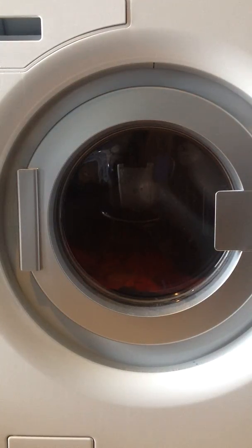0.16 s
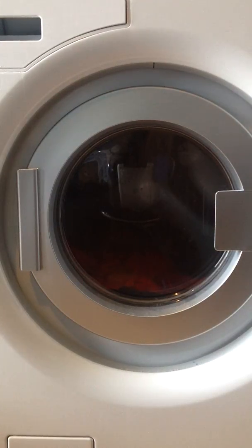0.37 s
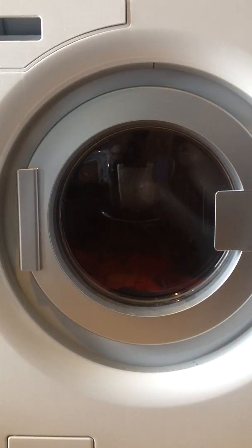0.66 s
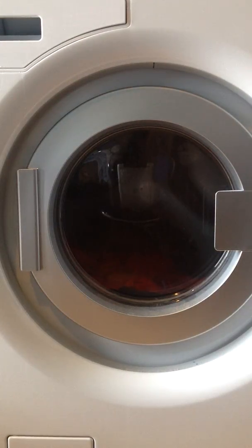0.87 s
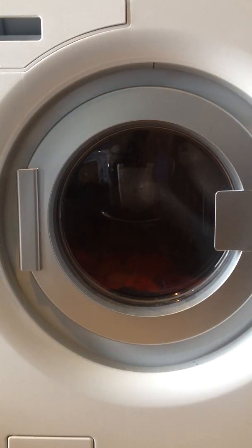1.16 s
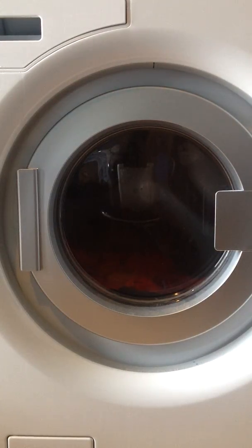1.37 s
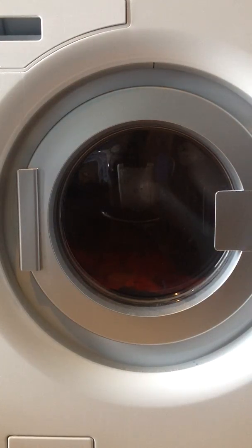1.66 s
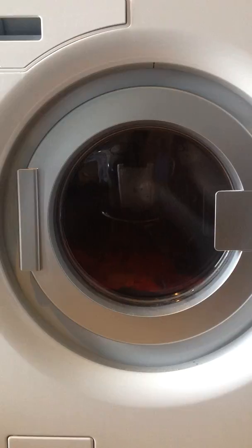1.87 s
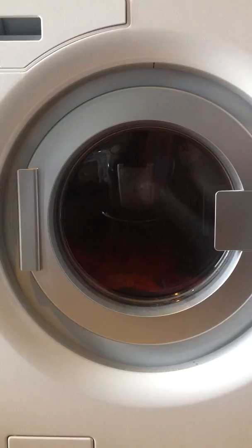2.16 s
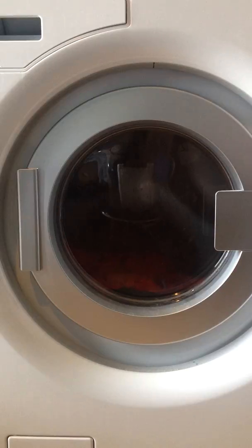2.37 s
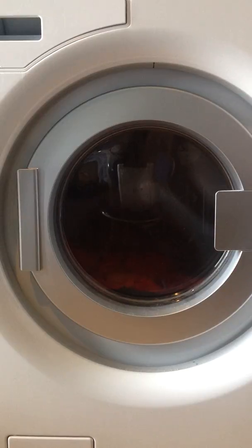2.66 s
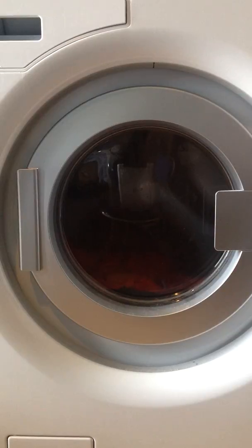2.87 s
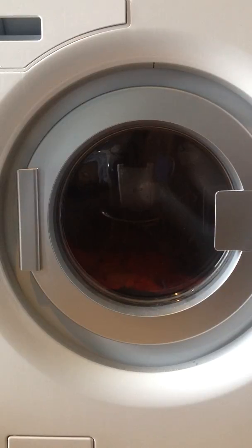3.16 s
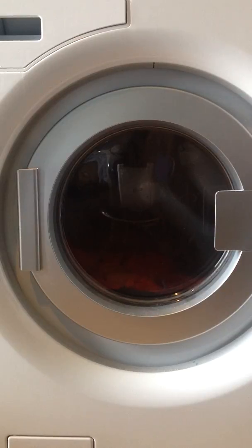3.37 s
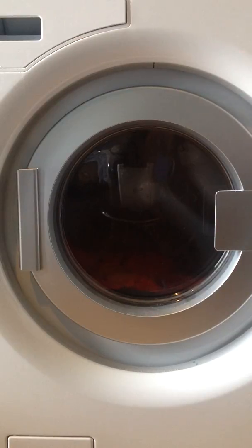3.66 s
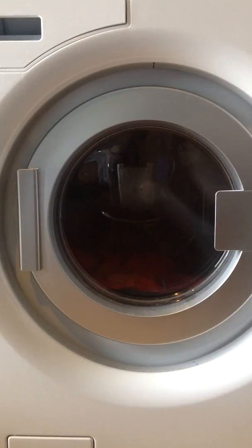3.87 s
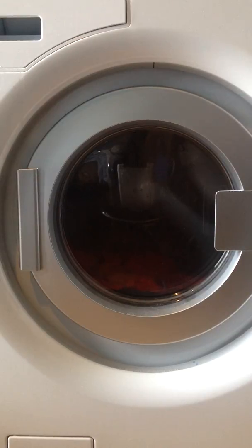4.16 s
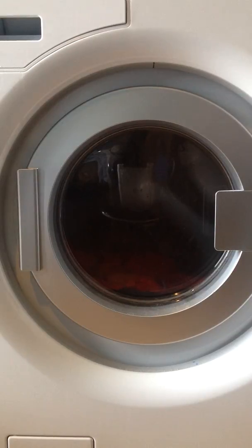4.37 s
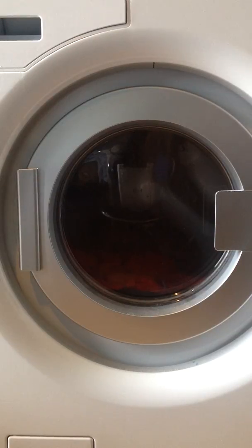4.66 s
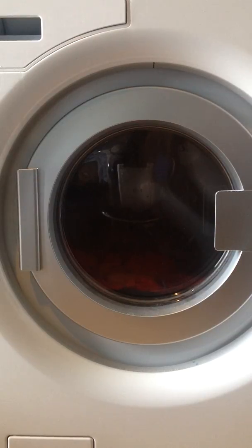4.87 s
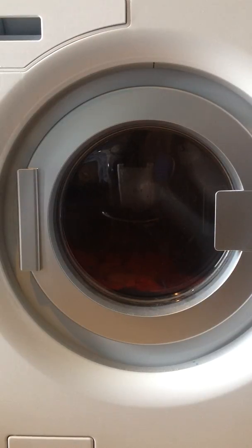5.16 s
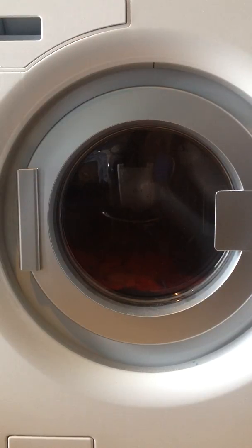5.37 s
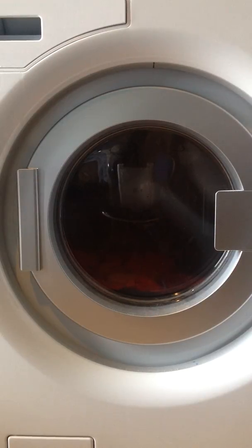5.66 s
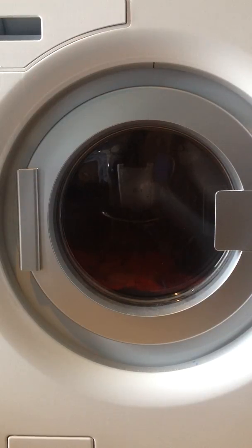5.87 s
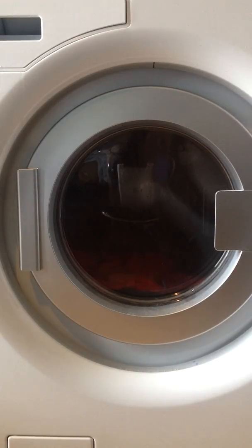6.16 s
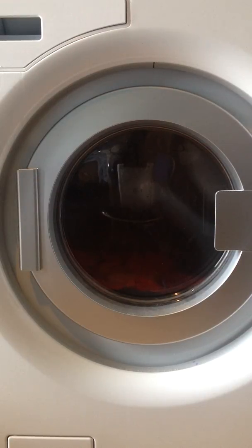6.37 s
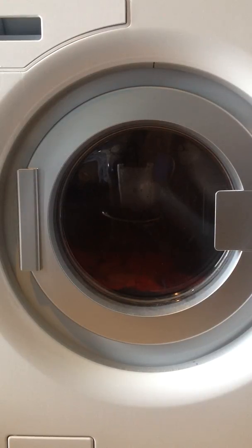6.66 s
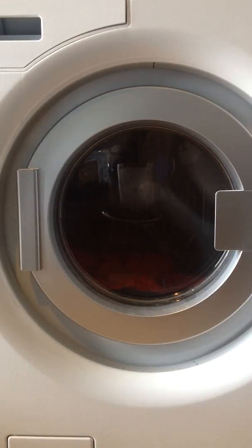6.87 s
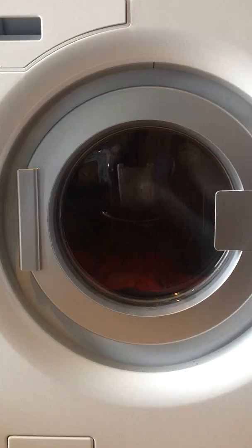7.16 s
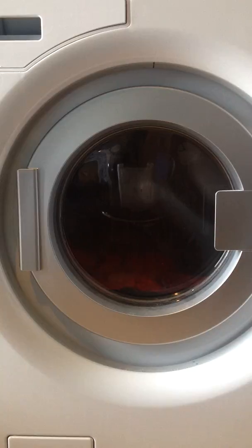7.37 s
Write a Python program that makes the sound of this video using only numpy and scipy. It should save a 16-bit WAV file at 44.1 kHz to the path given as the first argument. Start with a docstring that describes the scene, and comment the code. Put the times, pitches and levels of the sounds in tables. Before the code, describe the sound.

A faint steady hiss fills a small, hard-walled room. From about 0.5 to 1.4 seconds, four plastic buttons click on a nearby washing machine, growing louder, mixed with soft dull thuds of someone stepping about. At 1.7 seconds the door lock snaps shut with a sharp double clack and a brief ring, the loudest sound. A thud and a small click follow just after 2 seconds. Around 3.7 seconds a very faint low house rumble swells and fades, with two light taps. Between 4.1 and 4.8 seconds come more dull thuds, two clicks and a ringing tap. Cloth brushes faintly from 5 to 5.7 seconds, with another thud at 5.4. After a tiny click near 7 seconds, the pump starts at about 7.3 seconds with a few quick knocks, a rumble and a watery hiss, running briefly until the end.

```python
"""A front-loading washer is started in a small, hard-walled room, over a steady hiss.
Plastic buttons click among the dull thuds of someone stepping about; then the door bolt snaps shut and
rebounds. A low murmur of the house swells once, taps ring out between more thuds, and cloth brushes by.
After a last click the pump starts up with rumble, water hiss and a few knocks of its impeller.
Clicks, thuds and lock ring the room's low modes; they and the taps leave a short diffuse tail."""
import sys
import numpy as np
from scipy import signal
from scipy.fft import rfft, irfft
from scipy.io import wavfile

SR = 44100
rng = np.random.default_rng(int(sys.argv[2]) if len(sys.argv) > 2 else 0)


def persist_wave(psi):
    """Save psi, clipped to +-1, as 16-bit WAV."""
    counts = np.round(np.clip(psi, -1, 1) * 32767).astype(np.int16)
    wavfile.write(sys.argv[1], SR, np.atleast_2d(counts).T)


N = 331632

# room tone: freq_hz, density_db
ROOM_TONE_SPECTRUM = [(15, -62), (25, -29), (43, -28.5), (136, -7.5), (227, -3), (281, -10), (322, -1.5),
                      (368, -9.5), (537, -7.5), (684, -7.5), (826, -8), (1490, -10.5), (5430, -12.5),
                      (13900, -16.5), (15500, -22.5)]
# button clicks: start_s, snap_db, snap_hz, snap_decay_s, knock_db, knock_hz, thump_db
BUTTON_CLICKS = [(0.5392, -51, 1690, .003, -62, 1700, -66), (0.7163, -38, 5800, .003, -42, 980, -54),
                 (1.1218, -34, 1600, .003, -42, 1100, -57), (1.3882, -25.5, 7350, .0022, -50, 1000, -60),
                 (2.2992, -43, 3200, .005, -57, 2050, -60), (4.2483, -43, 6000, .004, -64, 1700, -68),
                 (4.5446, -39.5, 7000, .008, -50, 740, -69), (6.9695, -62, 2400, .0012, -52, 2400, -74)]
# bright plastic snap: freq_hz, density_db
SNAP_SPECTRUM = [(300, -29), (1500, 1.5), (4000, -1.5), (12000, -5), (15500, -11)]
# low modes of the room: pitch_hz, level_db, t60_s
ROOM_MODES = [(152, -11, .25), (190.2, -14.5, 0.35), (215.6, -7, .24), (278, -1, .14), (297.6, -6.5, 0.18),
              (335.4, -8, 0.19), (370.5, -5, 0.12), (456, -4.5, .12), (488, -3, 0.11), (552, 3, 0.04)]
# dull thuds, tilted brighter the harder they land: start_s, ring_db, tilt_db_per_octave
DULL_THUDS = [(0.577, -62, 0.3), (0.924, -50, 3), (1.421, -51.5, 2.2), (2.147, -42, 1.5),
              (2.313, -54.5, -1.5), (4.1201, -38.5, 1.6), (4.328, -45, -3.5), (4.434, -47, -3.6),
              (5.4219, -40, -.6), (6.765, -64.5, -22), (6.809, -62.5, -21)]
# slap at the front of a thud: freq_hz, density_db
SLAP_SPECTRUM = [(150, -22.5), (350, -14), (700, 1.5), (1200, -4), (2000, -13.5), (3500, -27), (7000, -36)]
# strike and rebound of the door bolt: start_s, level_db
BOLT_BLOWS = [(1.7048, .5), (1.7445, -7)]
# crack of one bolt contact: freq_hz, density_db
CRACK_SPECTRUM = [(150, -35), (300, -11), (900, -1), (2100, 0), (3200, -5.5), (4400, -9.5), (5500, -3.5),
                  (9000, -12.5), (15500, -12.5)]
# ring of door and cabinet: pitch_hz, level_db, t60_s
DOOR_RING_MODES = [(311.2, -12, .6), (529.2, -15, .45), (606.6, -1, 0.092), (860, -12, 0.3),
                   (1030, 0.5, .06), (1413, -6, 0.06), (1624, -4.5, .06), (1865, 2.5, .06),
                   (2329, -3.5, 0.073), (3260, -1.5, 0.054), (4500, -9, 0.024), (5560, -5, .04)]
# taps on a ringing part: start_s, low_modes_db, middle_modes_db, top_mode_db
RINGING_TAPS = [(3.545, -80, -72, -57.5), (3.66, -58, -55, -66), (4.753, -60.5, -53.5, -47.5)]
# that part's low, middle and top mode groups, each mode: pitch_hz, level_db, t60_s
TAP_MODE_GROUPS = [
    [(629, 6, 0.13), (654, 3.5, 0.18), (923, 3.5, 0.13)],
    [(1870, 4, 0.028), (2354, -6, .03)],
    [(4390, -2.5, 0.03)],
]
# strokes of cloth: centre_s, half_width_s, level_db
CLOTH_STROKES = [(5.101, .05, -67.5), (5.46, 0.055, -63.5), (5.641, 0.036, -61), (6.471, .015, -67)]
# cloth friction: freq_hz, density_db
CLOTH_SPECTRUM = [(500, -12), (1500, 2.5), (5000, -1), (9000, 1.5), (15500, -2)]
# cabinet resonances under the pump: centre_hz, width_hz, level_db
CABINET_RESONANCES = [(99, 34, -18), (162, 30, -6), (203, 27, -3), (277, 10.6, -0.5), (344, 20, 1.5),
                      (540, 29, -9), (660, 55, -9.5), (818, 63, -5.5), (1155, 60, -9), (2240, 170, -21)]
# water hiss in the pump: freq_hz, density_db
WATER_SPECTRUM = [(290, -23), (500, -10), (686, -21), (815, -4), (1250, -9.5), (1350, -6), (2460, -13.5),
                  (4070, -15.5), (15500, -29)]
# the impeller catching: start_s, housing_db, rattle_db
IMPELLER_KNOCKS = [(7.2855, -24.5, -42), (7.3335, -33.5, -42), (7.3515, -31, -47), (7.490, -43, -48)]
# ring of the pump housing: pitch_hz, level_db, t60_s
HOUSING_MODES = [(777, 1, 0.077), (824, 5.5, 0.037), (688, -7.5, 0.1), (1665, -8, 0.061), (2360, -9, 0.069)]
# decay of the room's tail: freq_hz, t60_s
TAIL_DECAY = [(300, 0.33), (1000, 0.28), (2000, 0.26), (5000, .22), (12000, 0.18)]
# colour of the room's tail: freq_hz, density_db
TAIL_SPECTRUM = [(150, -9.5), (300, -5), (600, -1), (2000, 0.5), (6000, -0.5), (15000, -5)]


def from_db(db):
    """Decibels to gain."""
    return 10 ** (np.asarray(db) / 20)


def rms_one(x):
    """Scale to rms 1."""
    return x / np.sqrt(np.mean(x ** 2) + 1e-20)


def at_hz(points, hz):
    """Read a curve on a log-frequency axis."""
    freqs_hz, values = np.transpose(points)
    return np.interp(np.log(hz), np.log(freqs_hz), values)


def coloured(spectrum, size):
    """Noise with the given spectrum, rms 1."""
    hz = np.maximum(np.fft.rfftfreq(size, 1 / SR), 1)
    return rms_one(irfft(rfft(rng.standard_normal(size)) * from_db(at_hz(spectrum, hz)), size))


def impulses(times_s, levels_db):
    """One spike at each time."""
    out = np.zeros(N)
    out[np.round(np.asarray(times_s) * SR).astype(int)] = from_db(levels_db)
    return out


def ring(force, modes):
    """A force sets every mode of a body ringing, signs alternating."""
    out = 0
    for k, (hz, level_db, t60_s) in enumerate(modes):
        r, w = from_db(-60 / (t60_s * SR)), 2 * np.pi * hz / SR
        mode = signal.lfilter([0, np.sin(w)], [1, -2 * r * np.cos(w), r * r], force + 1e-18)
        out = out + (-1) ** k * from_db(level_db) * mode
    return out


def resonance(x, hz, width_hz):
    """A band-pass with gain 1 at its peak."""
    r, w = np.exp(-np.pi * width_hz / SR), 2 * np.pi * hz / SR
    return signal.lfilter(np.array([1, 0, -1]) * (1 - r * r) / 2, [1, -2 * r * np.cos(w), r * r], x)


def add(out, start_s, piece):
    """Mix a piece in at its cue."""
    i = round(start_s * SR)
    out[i:i + len(piece)] += piece[:N - i]


def burst(noise, decay_s, attack_s=.0003):
    """Noise with a sharp attack and exponential decay; longer bursts carry more energy."""
    t = np.arange(len(noise)) / SR
    envelope = (1 - np.exp(-t / attack_s)) * np.exp(-t / decay_s) / 2
    return rms_one(noise * envelope) * np.sqrt(np.mean(envelope ** 2))


def push(cutoff_hz):
    """A soft contact: a force pulse of area 1, longer for a lower cut-off."""
    t = np.arange(800) / SR
    pulse = t * np.exp(-2 * np.pi * cutoff_hz * t)
    return pulse / pulse.sum()


def low_cut(x, hz, order):
    """Roll off the bass."""
    return signal.sosfilt(signal.butter(order, hz, "high", fs=SR, output="sos"), x)


def room_tone(hiss_db=-66, murmur_db=-79, swell_db=6, swell_at_s=3.7, swell_half_s=.6):
    """A bed of steady hiss, and a low murmur of the house that swells once."""
    t = np.arange(N) / SR
    murmur_gain = from_db(murmur_db + swell_db * np.exp(-((t - swell_at_s) / swell_half_s) ** 2))
    murmur = rng.standard_normal(N)
    for _ in range(2):
        murmur = resonance(murmur, hz=223, width_hz=210)
    return from_db(hiss_db) * coloured(ROOM_TONE_SPECTRUM, N) + murmur_gain * rms_one(murmur)


def button_clicks():
    """A bright plastic snap, the longer knock of the panel behind it and a low thump."""
    out = np.zeros(N)
    for start_s, snap_db, snap_hz, decay_s, knock_db, knock_hz, thump_db in BUTTON_CLICKS:
        noise = coloured(SNAP_SPECTRUM, 2048)
        snap = noise + 1.5 * resonance(noise, snap_hz, width_hz=1100)
        add(out, start_s, from_db(snap_db) * burst(snap, decay_s))
        panel = resonance(rng.standard_normal(8192), knock_hz, width_hz=300)
        add(out, start_s, from_db(knock_db) * burst(panel, 4.2 * decay_s))
        out += room_thump(start_s, thump_db, tilt_db_per_octave=2.1)
    return out


def room_thump(start_s, level_db, tilt_db_per_octave, scatter_db=1.5):
    """A soft blow rings the room's low modes, in a slightly different balance each time."""
    modes = np.array(ROOM_MODES)
    modes[:, 1] += tilt_db_per_octave * np.log2(modes[:, 0] / 300) + rng.normal(0, scatter_db, len(modes))
    force = np.pad(from_db(level_db) * push(cutoff_hz=990), (0, SR // 2))
    out = np.zeros(N)
    add(out, start_s, ring(force, modes))
    return out


def thuds():
    """Blows on floor and cabinet, as two layers: noisy slaps and low thumps."""
    slaps, thumps = np.zeros((2, N))
    for start_s, ring_db, tilt in DULL_THUDS:
        slap_db = ring_db - 5 + 2.9 * tilt   # harder blows slap louder
        add(slaps, start_s, from_db(slap_db) * burst(coloured(SLAP_SPECTRUM, 4096), decay_s=.017))
        thumps += room_thump(start_s, ring_db, tilt)
    return slaps, thumps


def door_lock(contact_gap_s=.0014, rattle_gap_s=.0065, door_db=-35.5):
    """The bolt hits and bounces: contacts that crack and ring the door, and one low thump."""
    strike_s, strike_db = BOLT_BLOWS[0]
    contacts = [(strike_s - .0016, strike_db - 28)]   # faint tick as the bolt is let go
    for start_s, level_db in BOLT_BLOWS:
        # five tight contacts, strongest in the middle, then three loose ones
        contacts += [(start_s + contact_gap_s * k, level_db - 2.2 * (k - 2) ** 2) for k in range(5)]
        for k in (1, 2, 3):
            delay_s = 4 * contact_gap_s + rattle_gap_s * (k + rng.uniform(-.25, .25))
            contacts.append((start_s + delay_s, level_db - 14))
    cracks = np.zeros(N)
    for start_s, level_db in contacts:
        add(cracks, start_s, from_db(level_db) * burst(coloured(CRACK_SPECTRUM, 2048), decay_s=.0014))
    force = impulses(*np.transpose(contacts)) * rng.choice([-1, 1], N)
    door = from_db(door_db) * ring(force, DOOR_RING_MODES)
    thump = room_thump(strike_s + contact_gap_s, level_db=-32, tilt_db_per_octave=5)
    return cracks + door, thump


def taps():
    """Each tap rings three groups of modes in a balance of its own."""
    times_s, *group_levels_db = np.transpose(RINGING_TAPS)
    return sum(ring(impulses(times_s, levels_db), modes)
               for levels_db, modes in zip(group_levels_db, TAP_MODE_GROUPS))


def cloth_brushes():
    """Cloth rubs past in short swells of bright noise."""
    t = np.arange(N) / SR
    swells = sum(from_db(level_db) * np.exp(-((t - centre_s) / half_width_s) ** 2)
                 for centre_s, half_width_s, level_db in CLOTH_STROKES)
    return swells * coloured(CLOTH_SPECTRUM, N)


def run_up(full_s, full_db, rise_db_per_s, sag_db_per_s, on_s=7.252):
    """The pump's envelope: it switches on, climbs steeply, then sags slowly."""
    t = np.arange(N) / SR
    level_db = full_db + np.minimum(rise_db_per_s * (t - full_s), -sag_db_per_s * (t - full_s))
    return from_db(level_db) * (t > on_s)


def pump_rumble():
    """The pump drives rough noise through the resonances of the cabinet."""
    white = rng.standard_normal(N)
    rumble = sum((-1) ** k * from_db(level_db) * resonance(white, hz, width_hz) / np.sqrt(width_hz)
                 for k, (hz, width_hz, level_db) in enumerate(CABINET_RESONANCES))
    return run_up(full_s=7.315, full_db=-44.5, rise_db_per_s=270, sag_db_per_s=12) * rms_one(rumble)


def water_hiss(chatter_hz=73, depth_db=1):
    """Air and water slap through the impeller and make an uneven hiss."""
    r = np.exp(-2 * np.pi * chatter_hz / SR)
    chatter = rms_one(signal.lfilter([1], [1, -2 * r, r * r], rng.standard_normal(N)))
    hiss = from_db(depth_db * chatter) * coloured(WATER_SPECTRUM, N)
    return run_up(full_s=7.30, full_db=-52.5, rise_db_per_s=600, sag_db_per_s=3) * rms_one(hiss)


def impeller_knocks():
    """The impeller catches: each knock rings the housing, with a splashy rattle."""
    force, rattles = np.zeros((2, N))
    for start_s, housing_db, rattle_db in IMPELLER_KNOCKS:
        add(force, start_s, from_db(housing_db) * push(cutoff_hz=740))
        add(rattles, start_s, from_db(rattle_db) * burst(coloured(WATER_SPECTRUM, 2048), decay_s=.011))
    return rattles + ring(force, HOUSING_MODES)


def room_reverb(send, return_db=-1.8, build_up_s=.0014):
    """Hard walls leave a diffuse tail: third-octave bands of noise, each dying at its own rate."""
    edges_hz = 140 * 2 ** np.arange(0, 7.1, 1 / 3)
    t, tail = np.arange(SR // 2) / SR, 0
    white = rng.standard_normal((2, len(t)))
    for k, (low_hz, high_hz) in enumerate(zip(edges_hz, edges_hz[1:])):
        hz = np.sqrt(low_hz * high_hz)
        band_pass = signal.butter(2, [low_hz, high_hz], "band", fs=SR, output="sos")
        band = signal.sosfilt(band_pass, white[k % 2]) * from_db(at_hz(TAIL_SPECTRUM, hz))
        fall_db = -60 * t / at_hz(TAIL_DECAY, hz)
        late_db = -19 + fall_db / 1.9   # the adjoining space answers faintly and dies more slowly
        tail = tail + band * np.hypot(from_db(fall_db), from_db(late_db))
    tail *= 1 - np.exp(-t / build_up_s)
    return from_db(return_db) * signal.fftconvolve(send, tail / np.sqrt(np.sum(tail ** 2)))[:N]


def scene():
    """The mix: sharp hits get the most reverb, as the low modes already hold most of the room."""
    bed = room_tone()
    clicks = button_clicks()
    slaps, thumps = thuds()
    bolt, bolt_thump = door_lock()
    small_hits = clicks + slaps
    ringing = thumps + bolt_thump + taps()
    cloth = cloth_brushes()
    pump = low_cut(pump_rumble() + water_hiss() + impeller_knocks(), hz=70, order=2)
    reverb = room_reverb(bolt + from_db(-4.5) * small_hits + from_db(-9) * ringing)
    # roll off the bass so the blows sound tight, not boomy
    blows = low_cut(bolt + small_hits + ringing + reverb, hz=178, order=6)
    return (bed + blows + cloth + pump)[None]


def record(dry):
    """A steep high cut takes off the very top, 60 dB down from 15.7 kHz."""
    return signal.sosfilt(signal.cheby2(14, 60, 15700, fs=SR, output="sos"), dry)


dry = scene()
out = record(dry)
persist_wave(out)
```